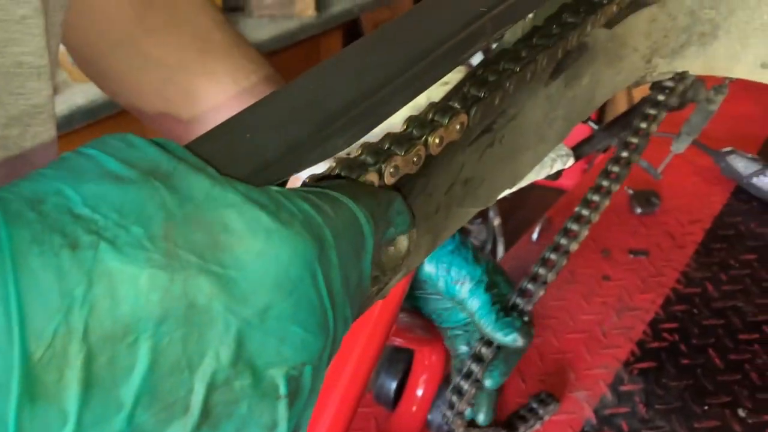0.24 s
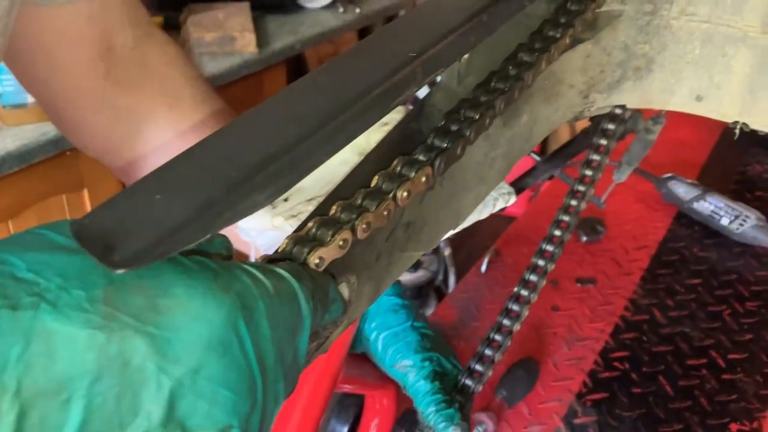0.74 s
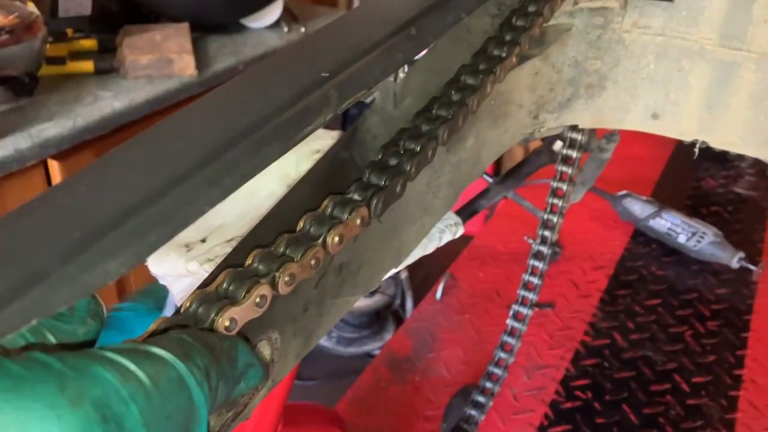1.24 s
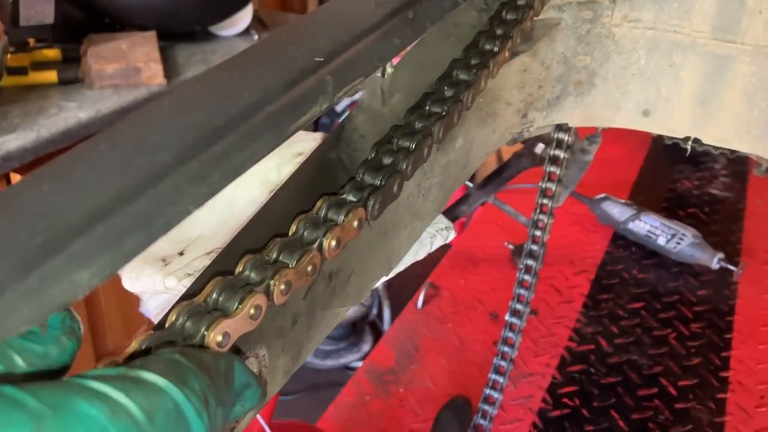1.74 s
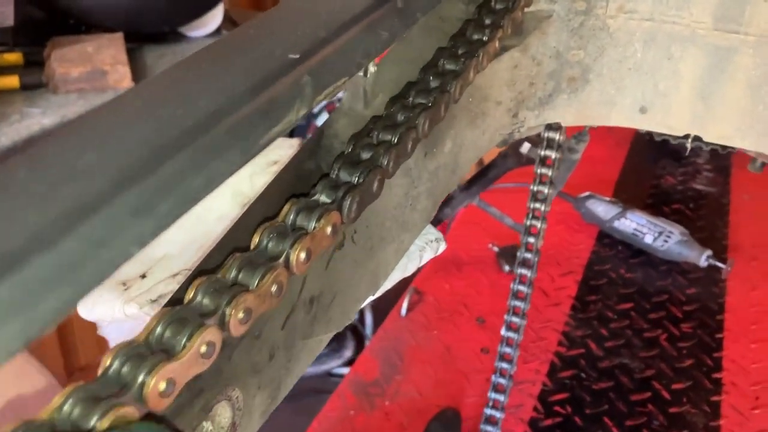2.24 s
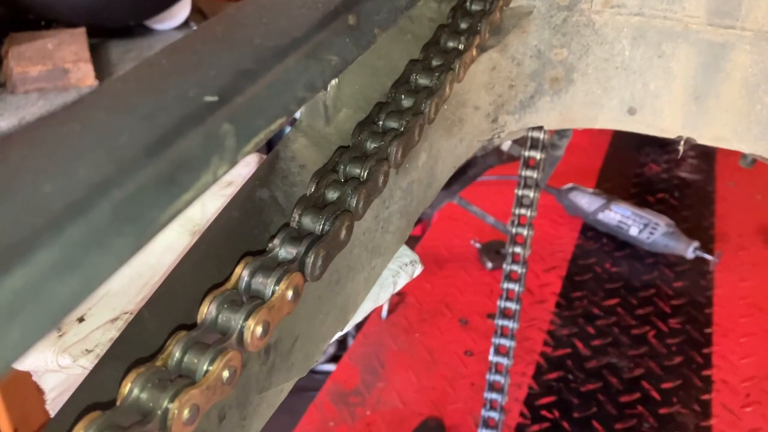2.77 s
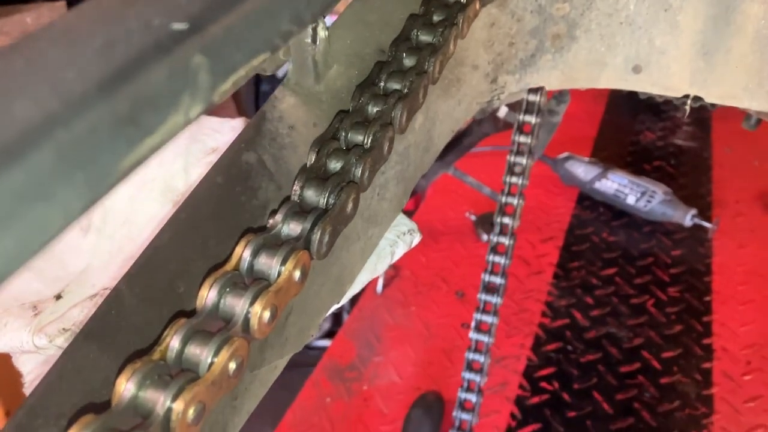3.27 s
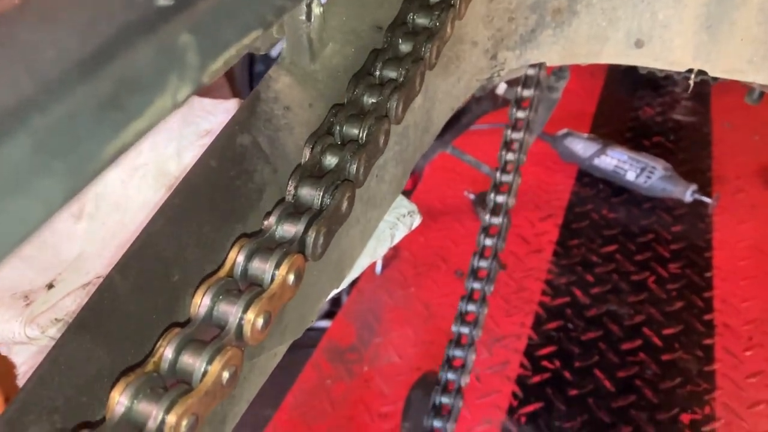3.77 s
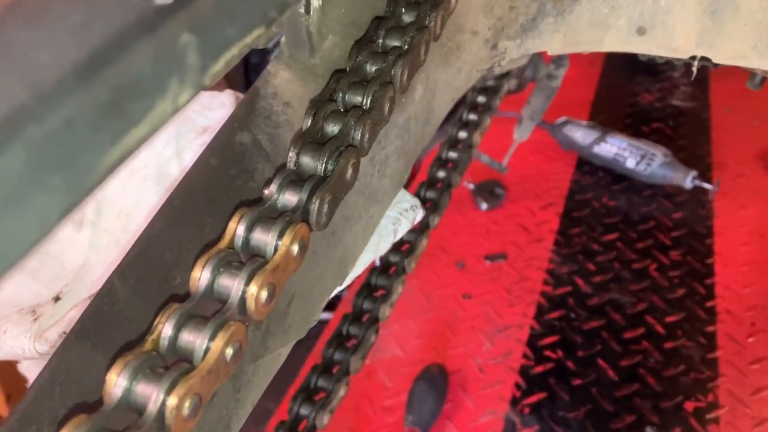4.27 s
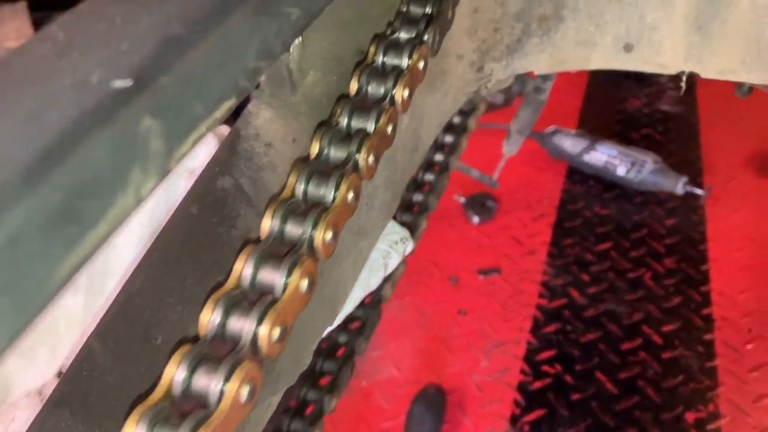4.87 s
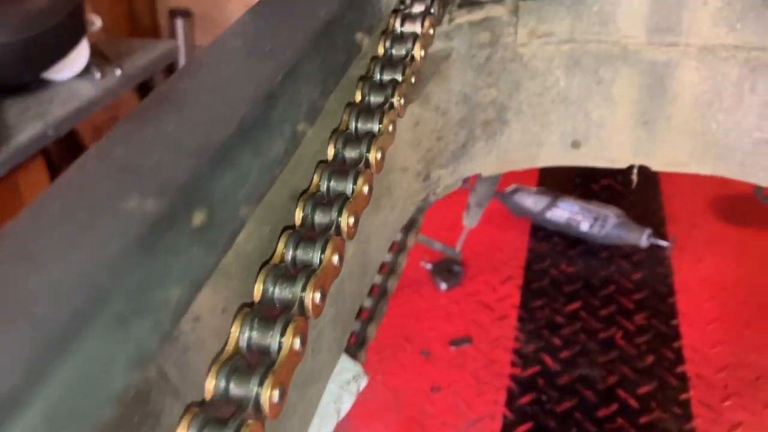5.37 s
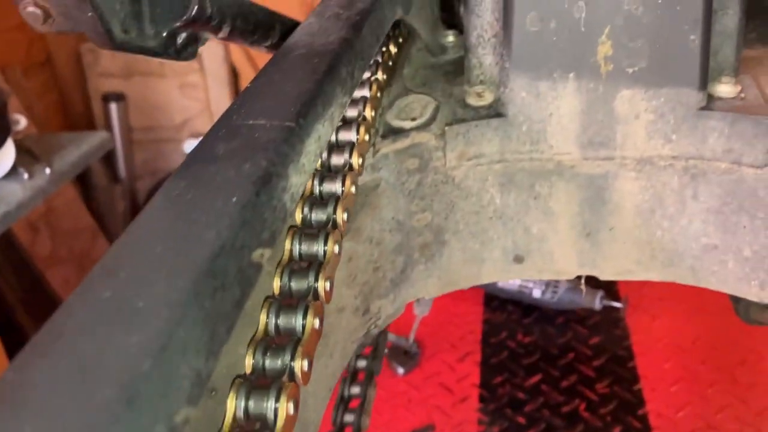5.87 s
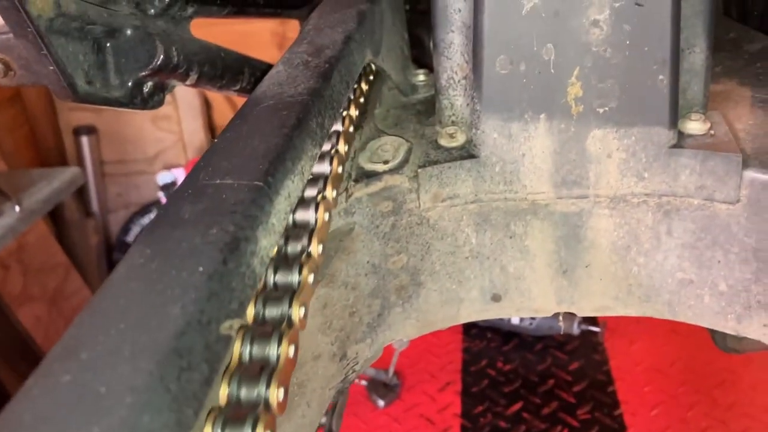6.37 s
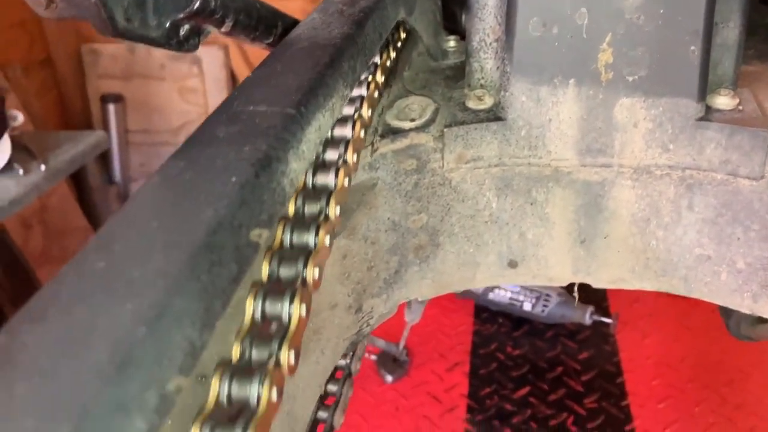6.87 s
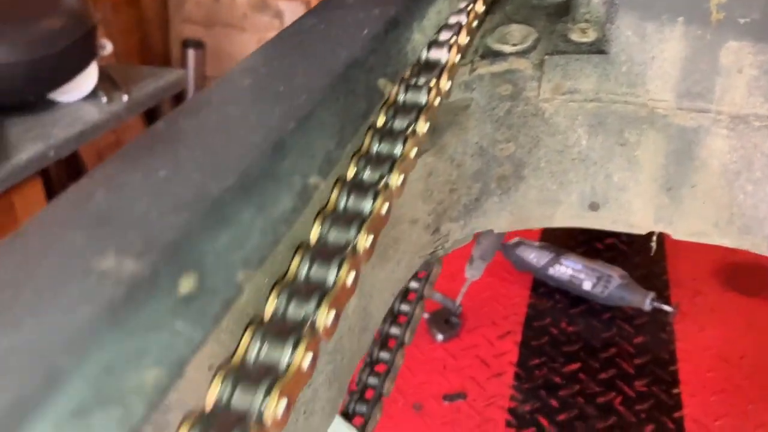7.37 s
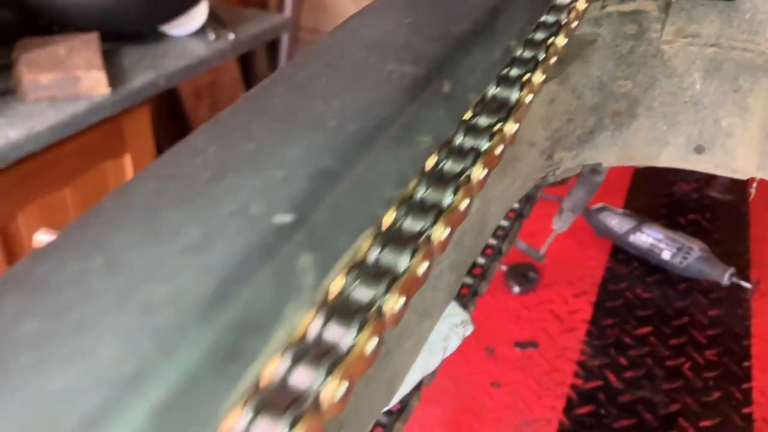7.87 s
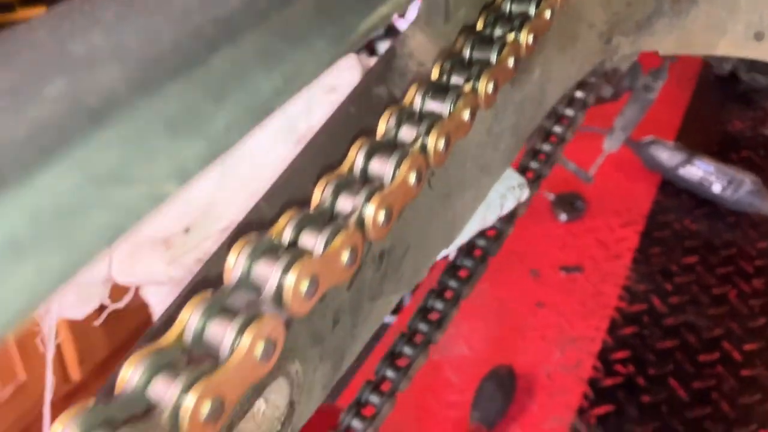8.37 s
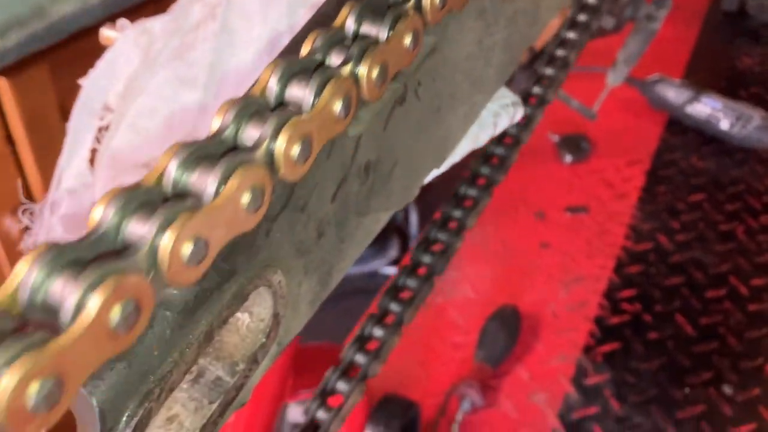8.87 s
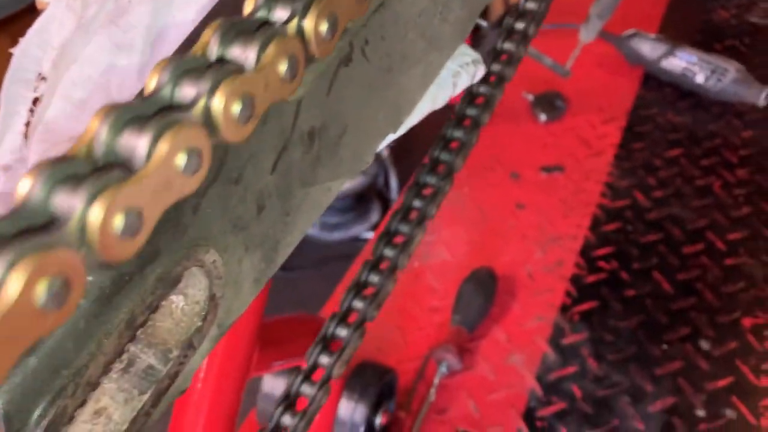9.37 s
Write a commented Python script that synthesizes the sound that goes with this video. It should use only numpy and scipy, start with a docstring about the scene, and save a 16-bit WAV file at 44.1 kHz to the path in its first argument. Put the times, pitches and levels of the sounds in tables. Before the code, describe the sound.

A greased metal drive chain is pulled by hand in a small workshop, with sharp bright clacks, dull link knocks, low flopping thuds and faint hiss.

```python
"""In a small workshop a greased motorcycle drive chain is pulled by hand along the swingarm, close to the microphone.
Links clack against the arm: noise bursts over ringing modes. The slack run flops with thuds of falling pitch.
Rollers tap over the guide, plates slide, joints tick, loose links chatter and a rubber glove rubs: all shaped noise.
Frame rumble, grease crackle and a fine hiss lie beneath; a short room tail and quiet air surround the chain."""
import sys
import numpy as np
from scipy import signal
from scipy.fft import rfft, irfft, next_fast_len
from scipy.io import wavfile
from scipy.ndimage import uniform_filter1d, map_coordinates

SR = 44100
rng = np.random.default_rng(int(sys.argv[2]) if len(sys.argv) > 2 else 0)


def wav_record(signal):
    """Record a signal, one row per channel, as 16-bit PCM in the file named by sys.argv[1]."""
    frames = np.transpose(np.atleast_2d(signal))
    bounded = np.clip(frames, -1, 1)
    # unit amplitude maps onto the largest positive 16-bit level
    quanta = np.round(bounded * 32767).astype(np.int16)
    wavfile.write(sys.argv[1], SR, quanta)


N = 424241
TIME = np.arange(N) / SR
AGE = np.arange(SR // 3) / SR  # time since a contact [s]


def amp(db):
    """Decibels to gain."""
    return 10 ** (np.asarray(db) / 20)


def unit(x):
    """Scale to rms 1."""
    return x / np.sqrt(np.mean(x ** 2) + 1e-20)


def onset_unit(x):
    """Scale a hit to rms 1 over its first 12 ms."""
    return x / np.sqrt(np.mean(x[:, :530] ** 2) + 1e-20)


def along(points, hz):
    """Read (frequency [Hz], value) points on a log frequency axis."""
    f, v = np.transpose(points)
    return np.interp(np.log(hz + 1), np.log(f + 1), v)


def over_time(points):
    """Read (time [s], value) points at every sample."""
    return np.interp(TIME, *np.transpose(points))


def wobble(rate):
    """A smooth random curve with this many knots a second."""
    knots = rng.standard_normal(int(N * rate / SR) + 4)
    return map_coordinates(knots, [TIME * rate])


def noise(size):
    """Two unrelated white noises."""
    return rng.standard_normal((2, size))


def grains(rate, scatter_db):
    """Tiny contacts at random moments, rate a second, of uneven size, each dying in about 3 ms; rms 1."""
    strikes = rng.random(N) < rate / SR
    sizes = strikes * amp(scatter_db * np.minimum(rng.exponential(size=N), 2.5))
    envelope = signal.lfilter([1], [1, -np.exp(-1 / 130)], sizes)
    return unit(envelope * noise(N))


def filtered(x, response):
    """Multiply the spectrum of x by a response of frequency."""
    n = x.shape[-1]
    m = next_fast_len(n + 8192)  # padding leaves room for the response to die away
    return irfft(rfft(x, m) * response(np.fft.rfftfreq(m, 1 / SR)), m)[..., :n]


def band(x, edges_hz, kind):
    """A causal band filter."""
    return signal.sosfilt(signal.butter(3, edges_hz, kind, fs=SR, output="sos"), x)


def resonate(x, modes):
    """Pass x through (frequency [Hz], width [Hz], level [dB]) resonances of alternating sign."""
    def response(hz):
        total = 0
        for k, (centre, width, db) in enumerate(modes):
            damping = 1j * hz * width
            total = total + (-1) ** k * amp(db) * damping / (centre * centre - hz * hz + damping)
        return total
    return filtered(x, response)


# left-right likeness of a sound: (frequency [Hz], correlation)
ALIKENESS = [(60, 0.96), (130, 0.95), (290, 0.91), (640, 0.52), (1400, 0), (3100, 0)]


def spread(pair, spectrum):
    """Colour two unrelated signals and mix them to left and right, alike in the bass; rms 1."""
    def gains(hz):
        turn = np.arccos(np.clip(along(ALIKENESS, hz), -1, 1)) / 2
        return amp(along(spectrum, hz)) * np.array([np.cos(turn), np.sin(turn)])
    mid, side = filtered(pair, gains)
    return unit(np.array([mid + side, mid - side]))


def ripple(x, depth_db, spacing_hz):
    """Each point of contact favours its own random set of the arm's resonances."""
    heights = rng.standard_normal(1024)
    return filtered(x, lambda hz: amp(depth_db * map_coordinates(heights, [hz / spacing_hz], mode="wrap")))


def patchy(x, depth_db):
    """The colour of the friction shifts from link to link."""
    z = signal.stft(x, nperseg=512)[2]
    field = rng.standard_normal(z.shape[1:])
    field = uniform_filter1d(field, size=9, axis=0)  # smooth over frequency
    field = uniform_filter1d(field, size=10, axis=1)  # smooth over time
    return signal.istft(z * amp(depth_db * unit(field)), nperseg=512)[1][:, :N]


def swell_of(x, s, half):
    """Start time and sound of the stretch of x around s seconds, swelling and fading."""
    near = np.abs(TIME - s) < .3
    return TIME[near][0], x[:, near] * np.exp(-((TIME[near] - s) / half) ** 2)


def add(track, s, sound):
    """Mix a sound into the track at s seconds."""
    start = max(round(s * SR), 0)
    part = track[:, start:start + sound.shape[1]]
    part += sound[:, :part.shape[1]]


# colour of the room's air: (frequency [Hz], relative level per Hz [dB])
AIR_COLOUR = [(20, 3.5), (90, -4.5), (230, -12.5), (330, -14.5), (480, -25), (900, -20), (1500, -31),
              (8000, -43), (16000, -49)]


def room_air(level_db=-57):
    """The quiet air of the room is steady noise, weighted to the bass."""
    return amp(level_db) * spread(noise(N), AIR_COLOUR)


# colour of the frame's rumble: (frequency [Hz], relative level per Hz [dB])
RUMBLE_COLOUR = [(20, -30), (45, -15), (68, -10), (85, 0), (102, -1.5), (135, -17), (200, -19), (320, -58),
                 (600, -97)]
# how the frame's rumble rises and falls: (time [s], relative level [dB])
RUMBLE_COURSE = [(0, -56.5), (1.2, -53.5), (2.3, -49.5), (2.85, -52), (3.8, -53.5), (4.2, -49), (5.25, -48),
                 (6.75, -56), (7.15, -47), (7.65, -65.5), (8.25, -56), (9.05, -65.5), (9.62, -62)]


def frame_rumble():
    """The moving chain rumbles in the frame: bass noise of changing level."""
    return amp(over_time(RUMBLE_COURSE) - 2) * spread(noise(N), RUMBLE_COLOUR)


def roller_taps(link_rate=19):
    """Envelope of rollers landing one by one at an unsteady rate, each tap dying in about 10 ms."""
    wandering_rate = link_rate * np.exp(0.39 * wobble(14))
    links = np.floor(np.cumsum(wandering_rate) / SR)
    landings = np.diff(links, prepend=links[0]) * amp(2.5 * wobble(30))
    return signal.lfilter([1], [1, -np.exp(-1 / (.01 * SR))], landings)


# loudness due to how fast the chain is drawn along: (time [s], relative level [dB])
SPEED_DB = [(0, 1), (.56, 1), (.85, -12.5), (1.02, 3), (1.3, -9.5), (1.8, 4), (2.3, 5), (2.72, 1.5),
            (2.96, -9), (3.12, 4.5), (3.5, -1), (3.72, -6), (4.7, 3), (5.35, 6), (6.75, 1), (7.25, 7),
            (7.75, -1.5), (9.62, 0.5)]
# loudness due to how hard the rollers bear on the guide: (time [s], relative level [dB])
PRESSURE_DB = [(0, 15), (.24, -6.5), (.58, 14), (.85, 4.5), (1.4, 2.5), (1.88, -12), (2.08, 14.5),
               (2.52, 15.5), (2.8, -5), (3.449, 2.5), (4.25, -5.5), (5.402, -4), (6.7, -5.5), (7.3, -1.5),
               (7.75, -10), (8.2, -11), (8.68, 15.5), (8.88, -20), (9.62, -0.5)]
# colour of the rollers: (frequency [Hz], relative level per Hz [dB])
ROLLER_COLOUR = [(60, -4), (160, 6), (310, 2), (480, -0.5), (750, -7.5), (1200, -9), (2200, -16.5),
                 (4000, -27.5), (9000, -31.5)]
# resonances of the chain guide: (frequency [Hz], width [Hz], relative level [dB])
GUIDE_MODES = [(230, 110, -6), (460, 55, -2.5), (622, 50, -7), (860, 60, -12), (1040, 55, -11),
               (1175, 96, -5)]


def rollers(taps, level_db=-59, speed_share=0.43):
    """Rollers tap and drag over the guide, which resonates; pressure and speed set the level."""
    rolling = (taps + .1) * noise(N)
    rolling = spread(patchy(rolling, depth_db=0.5), ROLLER_COLOUR)
    rolling = unit(rolling + 1.22 * unit(resonate(rolling, GUIDE_MODES)))
    return amp(level_db + over_time(PRESSURE_DB) + speed_share * over_time(SPEED_DB)) * rolling


# colour of the grease: (frequency [Hz], relative level per Hz [dB])
GREASE_COLOUR = [(500, 7.5), (2000, 6.5), (5000, 7), (7500, 4), (11000, 3), (15500, 2.5)]


def grease(taps, level_db=-63):
    """Grease crackles in random grains over a noise that swells with each roller's tap."""
    crackle = noise(N) * (1 + .6 * taps) + .5 * grains(rate=260, scatter_db=4)
    crackle = spread(patchy(crackle, depth_db=1.5), GREASE_COLOUR)
    return amp(level_db + over_time(SPEED_DB)) * crackle


# greased plates glide over plastic: (time [s], mean hiss level [dB])
GLIDE_COURSE = [(0, -92), (1.3, -80), (1.8, -61.5), (2.6, -72), (2.92, -100), (3.25, -82.5), (3.6, -102),
                (4.0, -62), (5.4, -66), (6.6, -105), (7.6, -69), (8.8, -85), (9.62, -67)]
# colour of greased plates on plastic: (frequency [Hz], relative level per Hz [dB])
HISS_COLOUR = [(2000, -25), (5000, -9), (7500, -1), (11500, -1), (15500, -5), (17000, -10)]


def glide():
    """Greased plates gliding over plastic give a fine, bright hiss of wavering level."""
    return amp(over_time(GLIDE_COURSE) + wobble(4.5)) * spread(noise(N), HISS_COLOUR)


# the swingarm rings: (frequency [Hz], relative level [dB], time to fall 60 dB [s])
ARM_MODES = [(1172, -6.5, 0.12), (1380, -6.5, 0.21), (1555, -0.5, 0.054), (1844, 4, 0.059),
             (2090, -3, 0.14), (2297, 2, 0.091), (2402, -2.5, 0.071), (2590, 2, 0.058), (2914, -5, 0.099),
             (3720, -2, 0.13), (3870, -15, 0.12), (4060, 6, 0.043), (4310, -6, 0.082), (4430, -1, 0.13),
             (4910, -8, 0.12), (6120, -10.5, 0.12), (6960, -4, 0.081)]
# colour of a steel contact: (frequency [Hz], relative level per Hz [dB])
STEEL_COLOUR = [(300, -21), (700, -5), (1100, -6.5), (2000, 6), (3000, 0), (4200, -2.5), (5500, -1),
                (7500, -1.5), (11000, -5), (16000, -26.5)]
# one plate touches, its neighbours land just after: (nominal delay [s], relative level [dB])
PLATE_CONTACTS = [(0, -4), (.0024, -1), (.0062, 3.5)]
# each mode of the arm dying away
RINGING = np.array([np.exp(2j * np.pi * hz * AGE) * amp(-60 * AGE / t60) for hz, db, t60 in ARM_MODES])


def clack(crack_t60=0.019, tail_t60=0.29, tail_db=-11, ring_db=-8.5, guide_db=-14, swell_s=.002):
    """A few plates land within milliseconds of each other, and the arm rings on."""
    stagger = rng.uniform(.8, 1.2)
    crack = 0
    for delay, db in PLATE_CONTACTS:
        since = AGE - delay * stagger
        crack = crack + (since >= 0) * amp(db - 60 * np.abs(since) / crack_t60)
    swell = 1 - np.exp(-(AGE / swell_s) ** 2)
    # the many weak modes of the arm blur into a noisy tail
    blur = unit(ripple(spread(noise(len(AGE)), STEEL_COLOUR), depth_db=0.5, spacing_hz=71.25))
    blur = blur * np.hypot(crack, amp(tail_db - 60 * AGE / tail_t60) * swell)
    hz, db, t60 = np.transpose(ARM_MODES)
    phase = rng.uniform(0, 2 * np.pi, len(hz)) + rng.normal(0, 1.0, (2, len(hz)))
    strength = amp(db + rng.normal(0, 4.5, len(hz))) * np.exp(1j * phase)
    # the weight of chain lying on the arm shifts its tuning a little
    stretch = 1 + .003 * rng.standard_normal()
    ring = np.array([np.interp(AGE * stretch, AGE, side) for side in (strength @ RINGING).imag]) * swell
    knock = resonate(crack * noise(len(AGE))[:1], GUIDE_MODES)
    return blur + amp(ring_db) * onset_unit(ring) + amp(guide_db) * onset_unit(knock)


# a struck link rings in close pairs: (multiple of its note, relative level [dB], time to fall 60 dB [s])
LINK_MODES = [(0.996, 13, 0.035), (1.025, 2, 0.046), (1.959, -9, 0.11), (2.03, 5, 0.013)]


def link_ring(note_hz, attack_s=0.00021, apart=0.91):
    """The short note of the struck link; its pitch depends on where it lands and how tightly it is held."""
    ratio, db, t60 = np.transpose(LINK_MODES)[..., None]
    age = AGE[:SR // 6]
    # the phases differ between left and right
    phase = rng.uniform(0, 2 * np.pi, ratio.shape) + apart * rng.standard_normal((2, *ratio.shape))
    modes = amp(db - 60 * age / t60) * np.sin(2 * np.pi * note_hz * ratio * age + phase)
    return onset_unit(modes.sum(axis=1) * (1 - np.exp(-age / attack_s)))


# links drop onto the guide at an even pace: (start [s], end [s], gap [s], mean relative level [dB])
EVEN_RUNS = [(4.464, 4.64, 0.043, -53), (5.324, 5.66, 0.0515, -45), (5.77, 5.87, 0.043, -52),
             (9.02, 9.2, 0.087, -52)]


def link_runs(knock_db=-1.5, bright_db=0.5, scatter_db=2.5, note_hz=475, note_db=-10.5):
    """Evenly spaced soft knocks of uneven strength, as rows of CLACK_HITS; the guide holds their note low."""
    rows = []
    for start, end, gap, db in EVEN_RUNS:
        for s in np.arange(start, end, gap):
            level = db + rng.normal(0, scatter_db)
            note = note_hz * np.exp(rng.normal(0, 0.055))
            rows.append((s, level, knock_db, bright_db, note, note_db))
    return rows


# links strike the arm; the last four columns shape each hit: (time [s], relative level [dB],
# knock band trim [dB], bright band trim [dB], note of the link [Hz], note re the hit's level [dB])
CLACK_HITS = [(0.0034, -37, 4.5, -12, 603, -6.5), (0.1223, -43.5, 0, -24, 993, -8),
              (0.337, -56, 11, -20, 1880, -3), (0.363, -37, 1, 8, 1650, -12),
              (0.486, -44, 3, -20, 1860, -4), (0.52, -37, 7, -20, 450, -5), (0.556, -41.5, 7, -25, 953, 5),
              (0.574, -34.5, -5, -3.5, 674, -4.5), (0.6253, -20.5, -15, -18, 2170, -36),
              (0.6517, -27.5, -4, -12, 1995, -18), (0.661, -41, 12, -1, 950, 7.5),
              (0.736, -57.5, 16, -27, 1850, 2), (0.9513, -47, 16.5, -29, 674, 2),
              (1.475, -54, 14.5, -20, 520, 1), (1.9428, -13.5, -10, -13, 2180, -13),
              (2.0397, -14.5, -6, -13, 1910, -26), (2.118, -26, -10, -9.5, 2000, -26),
              (2.1943, -35, 2.5, -17.5, 1067, -13), (2.3005, -59.5, 9, -22, 524, 16.5),
              (2.4055, -21, -6.5, -8.5, 2100, -31), (2.4799, -16.5, -8, -9.5, 1776, -13.5),
              (2.6615, -25.5, -1.5, -9.5, 744, -12.5), (3.2774, -17, -4, -5.5, 4170, -18.5),
              (4.0036, -48.5, 7, -13, 970, -5.5), (5.027, -40, 0.5, -14, 564, -16),
              (5.2227, -34.5, 2, -30, 610, -4), (6.241, -49, 3.5, 3.5, 467, -8),
              (6.3169, -46.5, 5.5, -1, 483, -3), (6.521, -51.5, 8, -2, 478, 5.5),
              (6.379, -48.5, 5.5, 2.5, 440, -8), (6.8183, -67, 11, -10, 476, 6),
              (6.928, -36.5, -2.5, -16, 1410, -18), (7.0193, -27, -3, -31, 2260, -9.5),
              (7.0989, -42.5, 0.5, -30, 2200, -5), (7.215, -48, 4.5, -20, 1220, -6),
              (7.358, -43.5, -2.5, -1, 495, -5), (7.417, -55.5, 6, -11, 457, 0),
              (7.9143, -34, -9.5, -34, 1500, -10), (7.957, -37.5, -17, -25, 1570, -15),
              (7.9894, -26.5, -23, -31, 3560, -15.5), (8.0361, -24.5, -15.5, -16, 3545, -14.5),
              (8.058, -34.5, -14, -7, 3340, -2), (8.086, -30.5, -8, -7.5, 3600, -13),
              (8.1485, -18, -11.5, 6, 2270, -25), (8.328, -40, -3, -5.5, 1210, -12),
              (8.358, -48.5, 11.5, -24, 762, -14), (8.391, -39.5, -1, -27, 2246, -7),
              (8.5095, -40.5, 2.5, -35, 2100, -9), (8.533, -23.5, -10, -13, 2195, -13.5),
              (8.623, -30, -3.5, -19, 997, -11), (8.638, -39.5, 1, -25, 854, -2),
              (8.843, -63.5, 10, -14, 478, 10), (8.938, -55.5, 4, 4, 465, 3.5),
              (9.3114, -59, 10.5, -12, 1148, -6), (9.3597, -46.5, -2, -3, 484, -20),
              (9.4533, -45, -4.5, -22, 1230, -5.5), (9.556, -57, 6, -4, 480, 2), (9.6, -56, 6, 4, 460, 6.5)]


def clacks(knock_db=-10, clink_db=-11, bright_db=-12, lead_in_db=-25, lead_in_s=0.0092):
    """Bare steel gives bright clacks; a link landing on the guide gives a dull knock."""
    track = np.zeros((2, N))
    before = AGE[:SR // 20]
    for s, db, knock, bright, note_hz, note_db in CLACK_HITS + link_runs():
        hit = clack()
        low = amp(knock + knock_db) * onset_unit(band(hit, [390, 1000], "bandpass"))
        middle = amp(clink_db) * onset_unit(band(hit, [1000, 5000], "bandpass"))
        high = amp(bright + bright_db - 60 * AGE / .5) * onset_unit(band(hit, 5500, "highpass"))
        add(track, s - .0028, amp(db) * (low + middle + high))  # first plate leads the link's note
        add(track, s, amp(db + note_db) * link_ring(note_hz))
        # a short noise swell leads into each clack
        lead_in = unit(band(noise(len(before)), [600, 4000], "bandpass"))
        lead_in = lead_in * np.exp((before - before[-1]) / lead_in_s)
        add(track, s - before[-1], amp(db + lead_in_db) * lead_in)
    return track


# the slack run slaps down: (time [s], relative level [dB], nominal pitch [Hz], frame boom trim [dB])
SLACK_SLAPS = [(0.003, -31.5, 199, -17), (0.95, -32, 276, -23), (1.035, -37.5, 170, 0.5),
               (1.474, -32, 223.6, -11), (1.538, -29, 183, -13.5), (1.592, -40, 168.5, -24),
               (2.3, -30, 252, 0), (2.323, -23, 189.3, 5.5), (2.356, -22.5, 153.4, 1.5),
               (3.487, -32, 219.7, -16), (3.548, -35, 182, -27), (4.002, -42.5, 220, 2),
               (4.062, -33, 206, -8), (4.118, -42, 162, 12.5), (4.728, -39.5, 168, 10.5),
               (5.025, -38, 243, 8), (5.218, -32.5, 224, -14), (5.248, -29.5, 148, 0),
               (5.956, -37, 150.5, 8.5), (6.937, -39.5, 235, -7), (7.047, -28, 225, 2.5),
               (7.076, -30, 153, 5), (7.48, -36, 185, 1.5), (8.112, -34, 129, 0), (8.168, -33, 195, 3),
               (8.21, -23.5, 170, -1), (8.374, -35.5, 251, -22), (8.57, -39.5, 200, -6)]


def slaps(jolt_db=-5, jolt_hz=157.4, jolt_boom_db=-10.5):
    """Rows of SLACK_SLAPS, with one light jolt of the slack run for each row of CLACK_HITS."""
    jolts = [(s, db + knock + jolt_db, jolt_hz, jolt_boom_db) for s, db, knock, *_ in CLACK_HITS]
    return SLACK_SLAPS + jolts


def thuds(t60=0.19, attack_s=0.0035, tone_db=1, shudder_db=-13, frame_hz=85, frame_db=-2, frame_t60=0.27):
    """Short waves outrun long ones along the slack chain, so each thud falls in pitch; the frame booms under it."""
    track = np.zeros((2, N))
    for s, db, hz, boom_db in slaps():
        pitch = hz * (.5 + .65 * np.exp(-AGE / .07))  # from 1.15 times the nominal pitch towards half of it
        tone = np.sin(2 * np.pi * np.cumsum(pitch) / SR)
        colour = [(25, -25), (.5 * hz, -8), (hz, 0), (2 * hz, -7), (4 * hz, -24), (3000, -60)]
        shudder = spread(noise(len(AGE)), colour)
        flop = amp(-60 * AGE / t60) * (amp(tone_db) * tone + amp(shudder_db) * shudder)
        boom_hz = frame_hz * (1 + 0.035 * rng.standard_normal())
        boom = amp(boom_db + frame_db - 60 * AGE / frame_t60) * np.sin(2 * np.pi * boom_hz * AGE)
        add(track, s, amp(db) * (1 - np.exp(-AGE / attack_s)) * (flop + boom))
    return track


# a stretch of chain slides over the arm:
# (centre time [s], half length [s], level before tilt [dB], brightness [dB per octave])
SLIDE_SWELLS = [(0.32, 0.06, -48, -4), (0.495, 0.077, -44, -3), (0.686, 0.081, -46.5, -8.5),
                (1.453, 0.094, -65.5, 4), (1.529, 0.03, -47.5, -5), (2.388, 0.023, -46.5, 0.5),
                (3.538, 0.046, -42.5, -0.5), (3.82, 0.057, -55, -2), (4.406, 0.02, -60.5, 3.5),
                (4.788, 0.078, -49, 1), (5.733, 0.0089, -53.5, 3.5), (6.006, 0.05, -55, 2.5),
                (7.054, 0.048, -43.5, -1), (7.493, 0.045, -47, 0.5), (8.02, 0.15, -49, -0.5),
                (8.192, 0.051, -39, -1), (8.692, 0.032, -48, 1.5)]
# colour of the sliding plates: (frequency [Hz], relative level per Hz [dB])
SLIDE_COLOUR = [(60, -36), (180, -13.5), (320, -14.5), (480, -8), (1000, -5.5), (2000, -5.5), (4000, -7.5),
                (7000, -13), (11000, -14.5), (16000, -26)]


def slides(guide_db=-4, arm_db=-7):
    """Side plates scrape along in short swells and set the guide and the arm ringing."""
    track = np.zeros((2, N))
    scrape = spread(1.01 * noise(N) + grains(rate=320, scatter_db=10), SLIDE_COLOUR)
    guide = unit(resonate(scrape, GUIDE_MODES))
    arm = unit(resonate(scrape, [(hz, 45, db) for hz, db, t60 in ARM_MODES]))
    friction = unit(scrape + amp(guide_db) * guide + amp(arm_db) * arm)
    for s, half, db, tilt in SLIDE_SWELLS:
        start, swell = swell_of(friction, s, half)
        # the tilt pivots at 1 kHz
        tilted = filtered(swell, lambda hz: amp(db + tilt * np.log2(np.clip(hz, 200, 4000) / 1000)))
        add(track, start, tilted)
    return track


# stiff joints snap free: (time [s], relative level [dB])
JOINT_TICKS = [(0.3086, -38.5), (0.3641, -28.5), (0.652, -26), (2.109, -34), (2.577, -35), (2.7802, -42.5),
               (5.3373, -33.5), (5.445, -33), (5.612, -42), (5.858, -41), (6.108, -32.5), (6.333, -37.5),
               (6.557, -38.5), (7.7523, -43.5)]


def ticks(trim_db=-7, t60=0.026):
    """Greasy joints let go with a thin, dry tick: a fast-dying burst of treble noise."""
    track = np.zeros((2, N))
    for s, db in JOINT_TICKS:
        snap = spread(noise(len(AGE)), [(1000, 3), (4000, 4.5), (7000, 4.5), (12000, 6.5), (16000, 0)])
        add(track, s, snap * amp(db + trim_db - 60 * AGE / t60))
    return track


# loose links jostle each other: (centre time [s], half length [s], level [dB])
CHATTER_SWELLS = [(0.51, 0.089, -52), (8.08, 0.076, -42)]


def chatter(rate=150, scatter_db=5):
    """Quick, uneven contacts between loose links keep the arm ringing."""
    track = np.zeros((2, N))
    contacts = unit(band(spread(grains(rate, scatter_db), STEEL_COLOUR), [900, 5000], "bandpass"))
    # a mode's width follows from its decay time
    modes = [(hz, np.log(1000) / (np.pi * t60), db) for hz, db, t60 in ARM_MODES]
    rattle = unit(contacts + unit(resonate(contacts, modes)))
    for s, half, db in CHATTER_SWELLS:
        add(track, *swell_of(amp(db) * rattle, s, half))
    return track


# resonances of rubber rubbing on the arm: (frequency [Hz], width [Hz], relative level [dB])
RUBBER_MODES = [(610, 90, 13), (2660, 260, 0)]
# the glove slips off the arm: (centre time [s], half length [s], level [dB])
GLOVE_RUBS = [(1.192, 0.062, -58.5), (1.403, 0.13, -60.5)]


def glove():
    """A rubber glove drags softly over the arm: noise through two resonances, in short swells."""
    track = np.zeros((2, N))
    rubber = unit(resonate(spread(noise(N), [(500, 0), (5000, 0)]), RUBBER_MODES))
    for s, half, db in GLOVE_RUBS:
        add(track, *swell_of(amp(db) * rubber, s, half))
    return track


# how long the room rings: (frequency [Hz], time to fall 60 dB [s])
ROOM_DECAY = [(150, 0.38), (400, 0.15), (1000, 0.18), (2800, 0.069), (7300, 0.12), (15000, 0.05)]


def workshop(x):
    """The small room answers with a noisy tail some 6 ms late, its bass lasting longest."""
    hz, t, z = signal.stft(noise(SR // 2), SR, nperseg=256)
    decay = amp(-60 * t / along(ROOM_DECAY, hz)[:, None])
    tail = signal.istft(z * decay, SR, nperseg=256)[1]
    tail = spread(tail, [(60, -14.5), (400, 0.5), (4000, -0.5), (16000, -7.5)]) / np.sqrt(tail.shape[1])
    return signal.fftconvolve(x, np.pad(tail, ((0, 0), (260, 0))), axes=1)[:, :N]


def scene():
    """The chain close by and its answer from the room, in quiet air, a little stronger to the right."""
    taps = roller_taps()
    running = frame_rumble() + rollers(taps) + grease(taps) + glide()
    chain = running + clacks() + thuds() + slides() + ticks() + chatter() + glove()
    balance = amp([[-.4], [.4]])
    return (chain + amp(-6) * workshop(chain) + room_air()) * balance


def ports(x, alike_hz=11350, period_hz=4400):
    """Between two microphone ports the treble swings in and out of phase as frequency rises."""
    def gains(hz):
        depth = np.interp(hz, [5500, 9000], [0, .99])
        swing = depth * np.cos(2 * np.pi * (hz - alike_hz) / period_hz)
        return np.sqrt([1 + swing, 1 - swing])
    mid, side = filtered(np.array([x[0] + x[1], x[0] - x[1]]) / 2, gains)
    return np.array([mid + side, mid - side])


def record(dry, top_hz=15900):
    """The microphone thins the deepest bass, lifts the bass just above, and passes nothing above top_hz."""
    bass = [(25, -21.5), (45, 4.0), (70, 2.5), (130, 0.5)]  # (frequency [Hz], gain [dB])
    return filtered(ports(dry), lambda hz: (hz < top_hz) * amp(along(bass, hz)))


dry = scene()
out = record(dry)
wav_record(out)
```